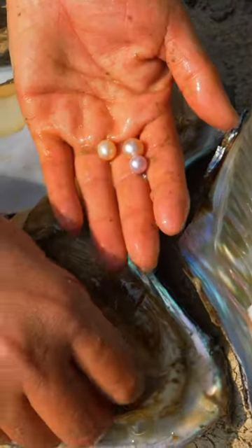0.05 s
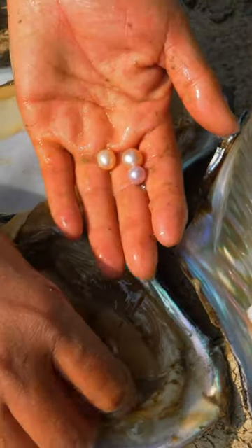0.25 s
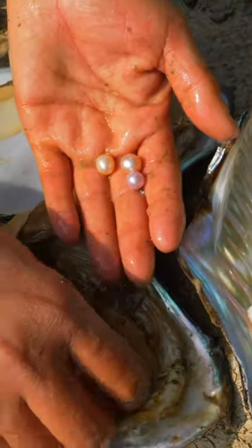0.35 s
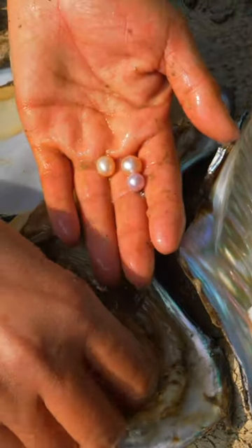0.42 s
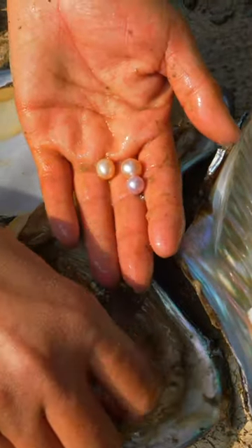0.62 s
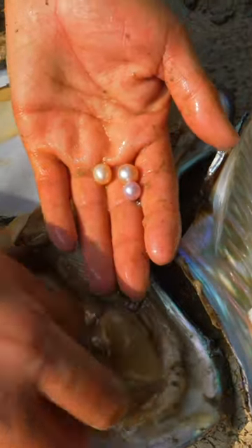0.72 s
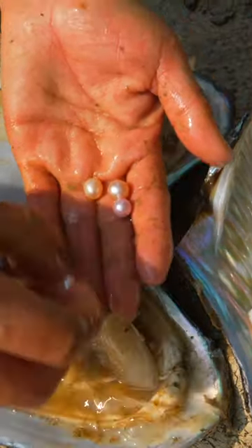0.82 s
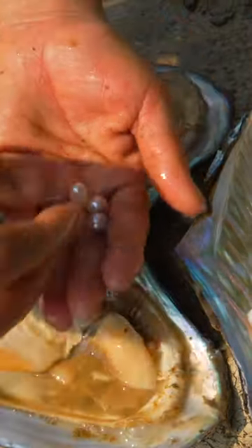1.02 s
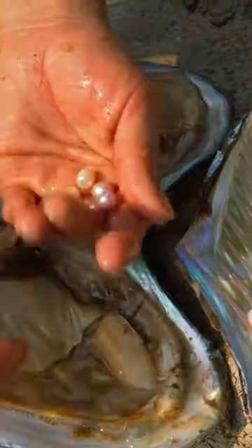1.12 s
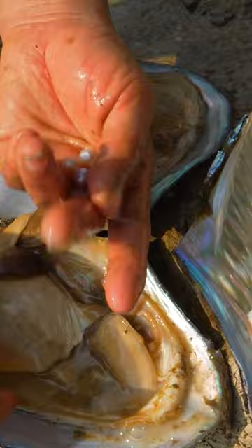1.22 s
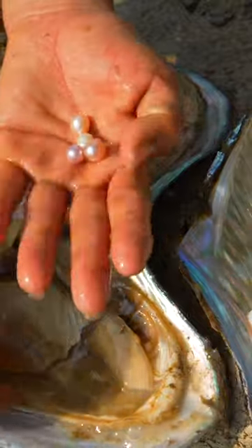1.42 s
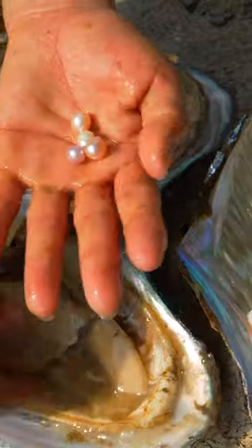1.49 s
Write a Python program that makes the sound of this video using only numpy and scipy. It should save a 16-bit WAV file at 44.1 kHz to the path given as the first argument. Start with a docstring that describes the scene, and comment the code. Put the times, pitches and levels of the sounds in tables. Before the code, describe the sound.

A wet mussel shell clacks sharply, then small pearls click together in a hand.

```python
"""A wet mussel shell clacks, rattles and settles close to the microphone as a hand picks out a pearl.
Each knock is a sharp crack, a short ring and a little grating from the rough rim.
The pearl drops among others in a palm, where they click together as the fingers close and open.
Wet fingers rub faintly on the shell and tiny bubbles pop, over a quiet, low background."""
import sys
import numpy as np
from scipy import signal
from scipy.fft import rfft, irfft, next_fast_len
from scipy.io import wavfile

SR = 44100
rng = np.random.default_rng(int(sys.argv[2]) if len(sys.argv) > 2 else 0)


def put_to_file(sound):
    """Save the sound as 16-bit audio at rate SR, in the file named by the first command-line argument."""
    columns = np.atleast_2d(sound).T  # one column per channel
    safe = np.clip(columns, -1, 1)
    whole_steps = np.round(safe * 32767)
    wavfile.write(sys.argv[1], SR, whole_steps.astype(np.int16))


N = 68355

# tone colour of the air noise (frequency [Hz], relative level [dB])
AIR_COLOUR = [(12, -29), (20, 6.5), (49, -5), (81, -7.5), (198, -5.5), (434, -10.5), (542, -5.5),
              (607, -13.5), (718, -13), (1290, -14), (2080, -20), (3440, -21.5), (4300, -29), (6360, -31),
              (9670, -39), (14700, -43), (16000, -42.5)]
# narrow bands of noise: the rumble, then the hums (centre [Hz], half width [Hz], level [dB])
HUM_BANDS = [(32.5, 4, -77.5), (120, 15, -70), (172, 9.2, -71.5), (212, 12, -73.5), (547.8, 17, -76)]
# how the rumble swells and sinks (time [s], gain [dB])
RUMBLE_SWELL = [(0, 2), (.2, -1.5), (.45, -6), (0.718, 12.5), (1.0, 8.5), (1.3, 17), (1.5, -14)]
# strokes of wet fingers on the shell (middle [s], half length [s], level [dB])
FINGER_STROKES = [(0.148, 0.0076, -59.5), (0.263, 0.024, -59), (0.532, 0.014, -65.5), (.645, 0.021, -81.5)]
# tone colour of the rubbing (frequency [Hz], relative level [dB])
RUB_COLOUR = [(500, -35.5), (2500, -20), (3550, 3), (4300, -19.5), (5050, -4.5), (6500, -24), (10000, -30),
              (16000, -46.5)]
# knocks on the shell (time [s], level [dB], tilt [dB/octave], ring gain [dB], main tone boost [dB])
SHELL_KNOCKS = [(0.208, -7.5, -0.5, 2.5, 3.5), (0.2195, -17.5, -2, 2.5, 8), (0.258, -17.5, -1.5, -4, 9),
                (.2949, -36.5, -4, 0.5, -2)]
# tones the shell rings with (frequency [Hz], level [dB], time to fade by 60 dB [s])
SHELL_TONES = [(1290, -29.5, 0.025), (2800, -18.5, .022), (3100, -28, .012), (3430, -12, .014),
               (3813, -9.5, .018), (4970, -6.5, 0.011), (5400, -24.5, 0.0063), (6100, -8.5, .011),
               (6590, -16, .012), (7800, -14.5, .007)]
# tone colour of a knock's crack (frequency [Hz], level [dB])
CRACK_COLOUR = [(400, -31.5), (700, -2), (1100, 4), (2100, 7), (2500, -7), (3100, 10.5), (3700, -4),
                (4300, -10), (5100, 6.5), (6500, -5), (8500, -5.5), (11700, -14), (13000, -21.5),
                (16000, -33.5)]
# tone colour of the grating rim (frequency [Hz], relative level [dB])
GRIT_COLOUR = [(1000, -11), (2500, -15), (4300, -23), (6000, 8.5), (9500, -5), (12000, -7.5),
               (15000, -22.5)]
# tiny wet bubbles (time [s], starting pitch [Hz], level [dB], time to fade by 60 dB [s])
BUBBLE_POPS = [(0.2948, 1550, -43.5, 0.028), (1.0362, 1755, -40.5, 0.033), (1.162, 2970, -56.5, .015)]
# pearls hitting each other
# (time [s], level [dB], tilt [dB/octave], low peak [Hz], its gain [dB], high peak [Hz], its gain [dB])
PEARL_CLICKS = [(1.0096, -14, 0.5, 3780, 12, 15700, 15), (1.0229, -34, -3, 3200, -1, 6000, 5),
                (1.0328, -8, -4, 2940, 6, 9600, -0.5), (1.038, -20.5, -3, 3020, 10, 9500, -1),
                (1.0411, -34.5, 1, 1780, 0, 3200, 23), (1.0428, -33, -13, 1700, 4, 3200, -2),
                (1.2206, -20, 0.5, 6260, 7.5, 9630, 2.5), (1.2445, -21.5, -3.5, 6000, 2, 13000, 15),
                (1.2479, -30, 0, 6000, 1.5, 13000, 4), (1.2687, -1, -0.8, 2850, 2.5, 9580, 15),
                (1.2728, -13, -0.5, 2800, -2, 8950, 13), (1.2754, -20.5, -3.5, 2800, 6, 8500, 10),
                (1.2854, -26.5, -1.5, 1990, 5.5, 8900, 1), (1.3326, -37, 1, 3200, 6, 5870, 6),
                (1.3614, -28.5, -0.5, 3300, 5.5, 6000, 1), (1.3727, -21.5, -0.5, 4300, 11.5, 9700, 7.5),
                (1.3890, -32.5, 6, 3440, 12, 9000, -8), (1.4401, -40, 0.5, 3040, 8, 9030, 7)]
# tone colour that all clicks share (frequency [Hz], level [dB])
CLICK_COLOUR = [(400, -39), (850, -18), (1300, -2), (2100, -2), (3100, 2), (4300, -10), (5300, -2),
                (6200, 2), (7000, -5), (9500, -9.5), (12000, -17), (14000, -23.5), (16000, -27.5)]
# sound bouncing off nearby hands and shells (frequency [Hz], time to fade by 60 dB [s])
NEAR_ECHO = [(1000, 0.02), (3000, .018), (6000, .013), (14000, .011)]
# the faint echo from farther away (frequency [Hz], time to fade by 60 dB [s])
FAR_ECHO = [(1000, 0.18), (3700, 0.13), (5000, 0.087), (6500, 0.28), (9500, 0.15), (15000, .2)]


def amp(db):
    """Turn decibels into a factor to multiply by."""
    return 10 ** (np.asarray(db) / 20)


def along(points, hz):
    """Read between the rows of a (frequency, value) table, on a log frequency scale."""
    freqs, values = np.transpose(points)
    return np.interp(np.log(hz + 1), np.log(freqs + 1), values)


def filtered(x, response):
    """Multiply each frequency in x by response(hz)."""
    size = next_fast_len(N + SR // 2)
    return irfft(rfft(x, size) * response(np.fft.rfftfreq(size, 1 / SR)), size)[..., :N]


def noise(response):
    """Filtered noise with an average power of 1."""
    x = filtered(rng.standard_normal(N), response)
    return x / np.sqrt(np.mean(x ** 2) + 1e-20)


def tilt(hz, slope_db, pivot_hz=3500):
    """Gain in dB that brightens or dulls a sound by slope_db per octave."""
    return slope_db * np.log2(np.maximum(hz, 500) / pivot_hz)


def snap(colour_db, size=2048):
    """The shortest pulse that starts at once and has the given tone colour."""
    cepstrum = irfft(np.log(amp(colour_db(np.fft.rfftfreq(size, 1 / SR)))))
    cepstrum[1:size // 2] *= 2  # folding onto the first half packs the energy at the start
    cepstrum[size // 2 + 1:] = 0
    return irfft(np.exp(rfft(cepstrum)))


def echo(fade_times):
    """A blur of reflections: noise whose frequencies fade at their own speeds, with total energy 1."""
    hz, t, spectrum = signal.stft(rng.standard_normal(SR // 3), SR, nperseg=64)
    fade = amp(-60 * t / along(fade_times, hz)[:, None])
    tail = signal.istft(spectrum * fade, SR, nperseg=64)[1]
    return tail / np.linalg.norm(tail)


def add(track, start_s, sound, near_db=-8, far_db=-25):
    """Put a sound on the track with its near and far echoes."""
    space = np.pad(amp(near_db) * echo(NEAR_ECHO) + amp(far_db) * echo(FAR_ECHO), (30, 0))
    space[0] = 1  # the direct sound, 30 samples ahead of the echoes
    start = round(start_s * SR)
    heard = signal.fftconvolve(sound, space)[:N - start]
    track[start:start + len(heard)] += heard


def background(air_db=-59):
    """Soft air noise, a slowly swelling rumble and a few wavering hums."""
    rumble, *hums = [amp(db) * noise(lambda hz: 1 / (1 + ((hz - centre) / width) ** 2))
                     for centre, width, db in HUM_BANDS]
    swell = amp(np.interp(np.arange(N) / SR, *np.transpose(RUMBLE_SWELL)))
    air = amp(air_db) * noise(lambda hz: amp(along(AIR_COLOUR, hz)))
    return air + swell * rumble + sum(hums)


def low_hum(hz=123, db=-61, fade_s=0.1):
    """A soft low tone is there at the start and quickly fades."""
    t = np.arange(N) / SR
    return amp(db) * np.exp(-(t / fade_s) ** 4) * np.sin(2 * np.pi * hz * t)


def finger_rubs():
    """Wet fingers slide on the shell, each stroke a soft swell of noise."""
    t = np.arange(N) / SR
    strokes = sum(amp(db) * np.exp(-((t - middle) / half) ** 2) for middle, half, db in FINGER_STROKES)
    return strokes * noise(lambda hz: amp(along(RUB_COLOUR, hz)))


def shell_knocks(chatter_s=0.0008, chatter_loss_db=8.5, rise_s=0.0006, main_hz=5000, main_width_hz=350):
    """In each knock the rim cracks down four times, ever softer, and the damp shell rings briefly."""
    out = np.zeros(N)
    for start_s, db, slope_db, ring_db, main_db in SHELL_KNOCKS:
        crack = snap(lambda hz: along(CRACK_COLOUR, hz) + tilt(hz, slope_db))
        t = np.arange(len(crack)) / SR
        freqs = np.fft.rfftfreq(len(t), 1 / SR)
        touches = sum(amp(-chatter_loss_db * k) * np.exp(-2j * np.pi * freqs * k * chatter_s)
                      for k in range(4))
        chatter = irfft(rfft(crack) * touches)
        ring = np.zeros(len(t))
        for k, (hz, tone_db, fade_s) in enumerate(SHELL_TONES):
            boost_db = tilt(hz, slope_db) + main_db * np.exp(-((hz - main_hz) / main_width_hz) ** 2)
            tone = amp(tone_db + boost_db - 60 * t / fade_s) * np.sin(2 * np.pi * hz * t)
            ring += (-1) ** k * tone  # neighbouring tones swing opposite ways
        knock = chatter + amp(ring_db) * ring * (1 - np.exp(-t / rise_s))
        add(out, start_s, amp(db) * knock, near_db=-7.5, far_db=-26)
    return out


def rim_grating(gain_db=-25.5, fade_s=0.017, rise_s=0.0006):
    """The rough rim grates for a few milliseconds after each knock."""
    out, t = np.zeros(N), np.arange(SR // 20) / SR
    for start_s, db, *_ in SHELL_KNOCKS:
        grit = noise(lambda hz: amp(along(GRIT_COLOUR, hz)))[:len(t)]
        loudness = amp(db + gain_db - 60 * t / fade_s) * (1 - np.exp(-t / rise_s))
        add(out, start_s, grit * loudness, near_db=-7.5)
    return out


def bubble_pops(rise_per_s=8):
    """Tiny bubbles ring and rise in pitch as they pop."""
    out, t = np.zeros(N), np.arange(SR // 20) / SR
    for start_s, hz, db, fade_s in BUBBLE_POPS:
        phase = 2 * np.pi * hz * t * (1 + rise_per_s * t / 2)
        add(out, start_s, amp(db - 60 * t / fade_s) * np.sin(phase))
    return out


def pearl_clicks(low_width_octaves=0.39, high_width_hz=1780):
    """Pearl hits pearl: a very short snap with two broad peaks in its tone colour."""
    out = np.zeros(N)
    for start_s, db, slope_db, low_hz, low_db, high_hz, high_db in PEARL_CLICKS:
        def colour_db(hz):
            low_peak = low_db * np.exp(-0.5 * (np.log2((hz + 1) / low_hz) / low_width_octaves) ** 2)
            high_peak = high_db * np.exp(-0.5 * ((hz - high_hz) / high_width_hz) ** 2)
            return along(CLICK_COLOUR, hz) + tilt(hz, slope_db) + low_peak + high_peak
        add(out, start_s, amp(db) * snap(colour_db))
    return out


def dip(hz, centre_hz=4380, width_hz=450, depth=0.638):
    """A narrow dip in the tone colour of all the close sounds."""
    return 1 - depth * 1j * hz * width_hz / (centre_hz ** 2 - hz ** 2 + 1j * hz * width_hz)


def scene(side_db=-24.5, hiss_db=-91, treble_hz=2500):
    """Mix it all; only faint hiss and a trace of high echo differ between left and right."""
    handling = filtered(shell_knocks() + rim_grating() + pearl_clicks() + finger_rubs() + bubble_pops(),
                        dip)
    treble = lambda hz: hz ** 4 / (hz ** 4 + treble_hz ** 4)
    reflections = signal.fftconvolve(handling, echo(NEAR_ECHO))[:N]
    side = amp(side_db) * filtered(reflections, treble) + amp(hiss_db) * noise(treble)
    return handling + background() + low_hum() + np.array([side, -side])


def record(dry, port_hz=6000, width_hz=3000, top_hz=16300):
    """The microphone's opening delays the treble, smearing each snap; the very top is cut off."""
    smeared = filtered(dry, lambda hz: np.exp(-2j * np.arctan2(hz * width_hz, port_hz ** 2 - hz ** 2)))
    return filtered(smeared, lambda hz: 1 / (1 + (hz / top_hz) ** 120))


dry = scene()
out = record(dry)
put_to_file(out)
```